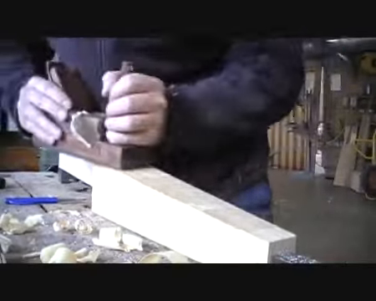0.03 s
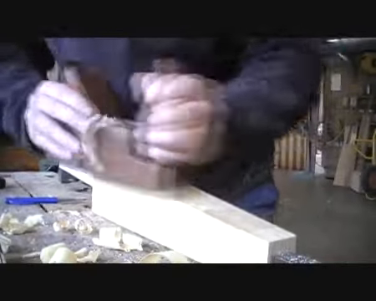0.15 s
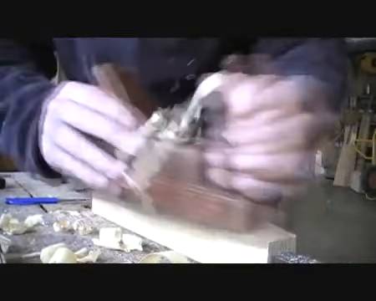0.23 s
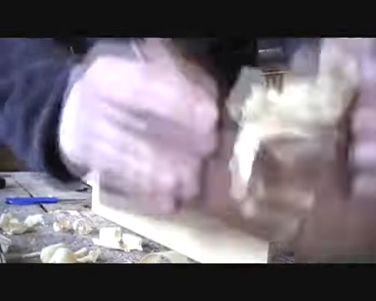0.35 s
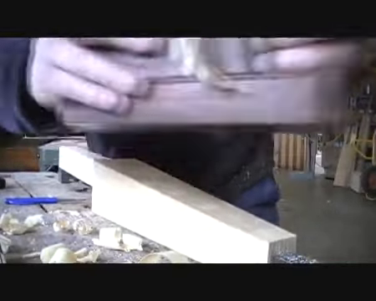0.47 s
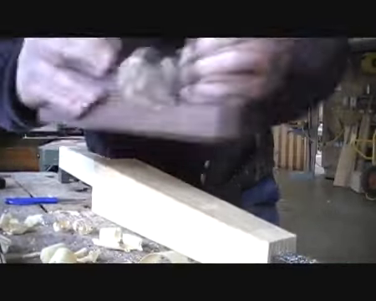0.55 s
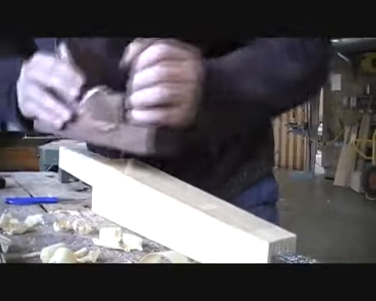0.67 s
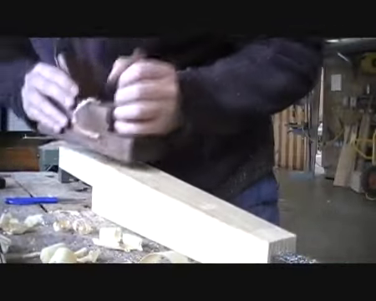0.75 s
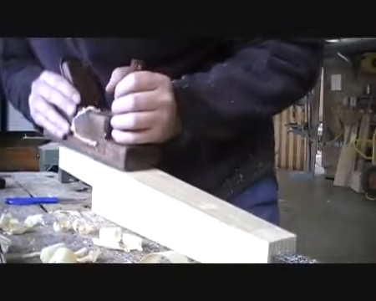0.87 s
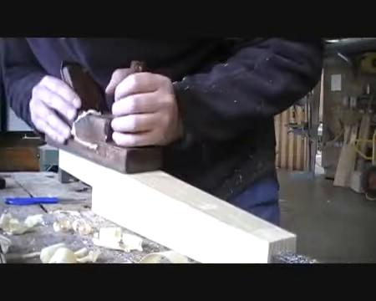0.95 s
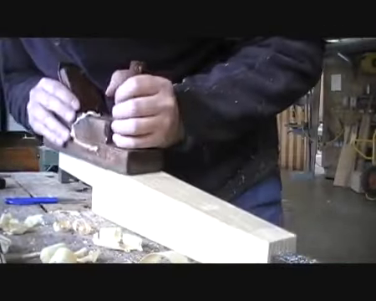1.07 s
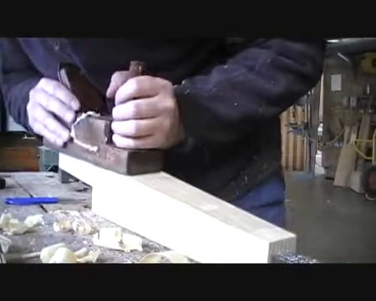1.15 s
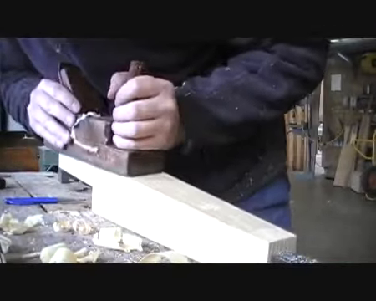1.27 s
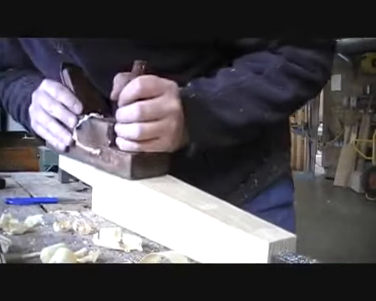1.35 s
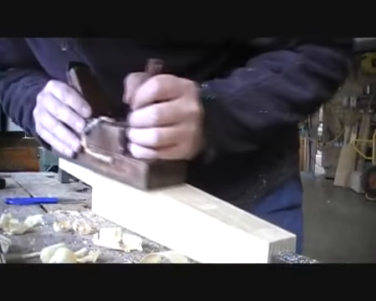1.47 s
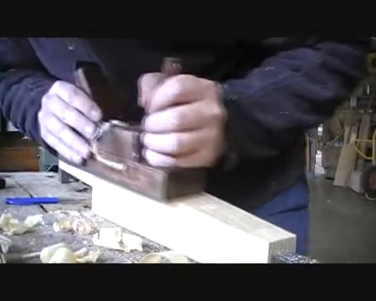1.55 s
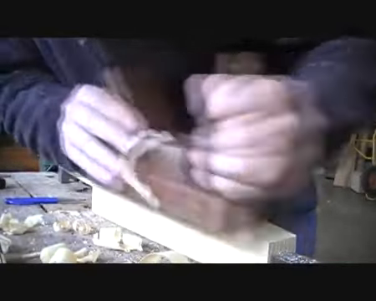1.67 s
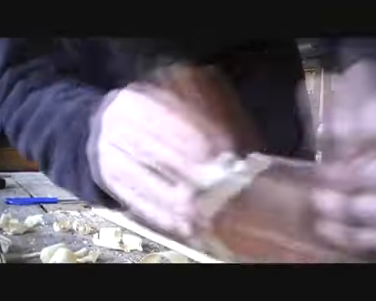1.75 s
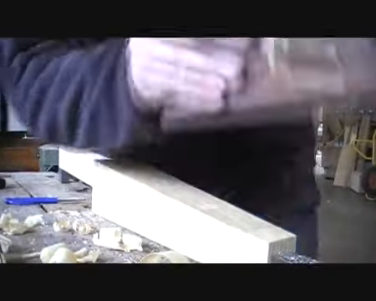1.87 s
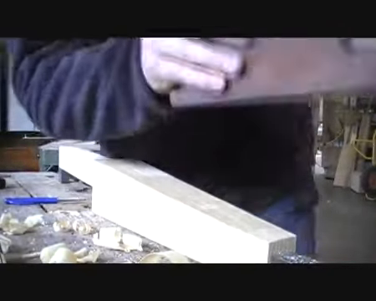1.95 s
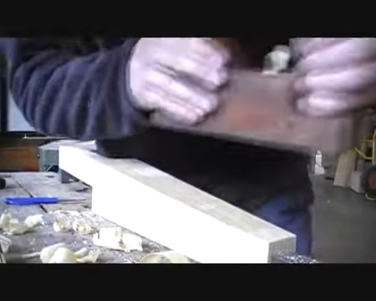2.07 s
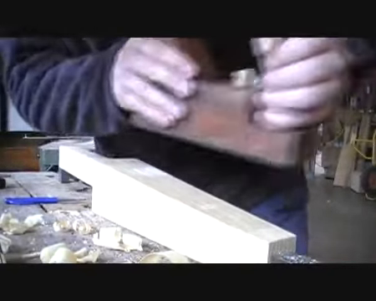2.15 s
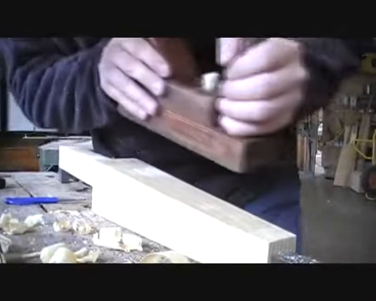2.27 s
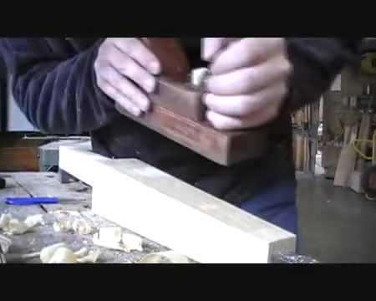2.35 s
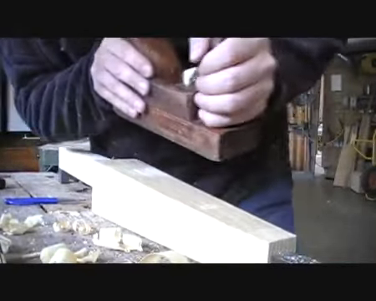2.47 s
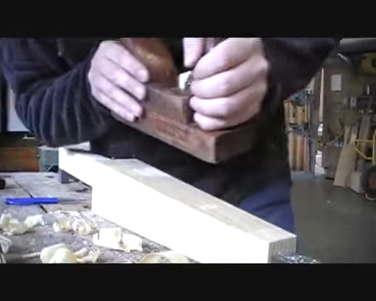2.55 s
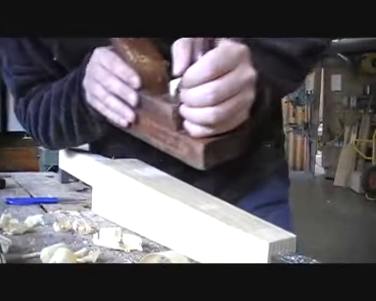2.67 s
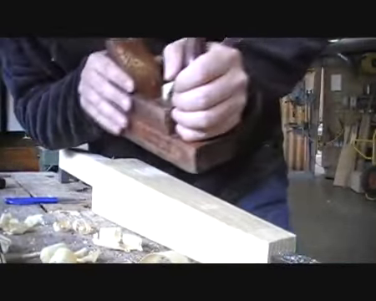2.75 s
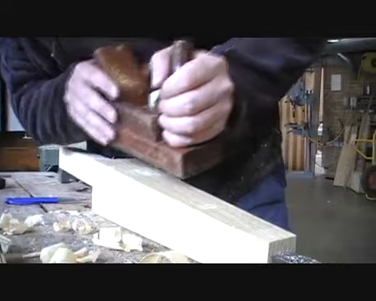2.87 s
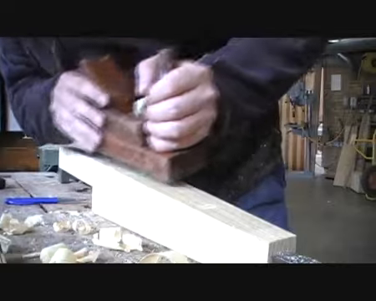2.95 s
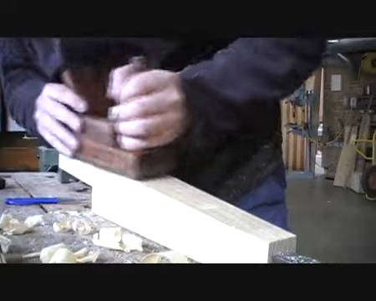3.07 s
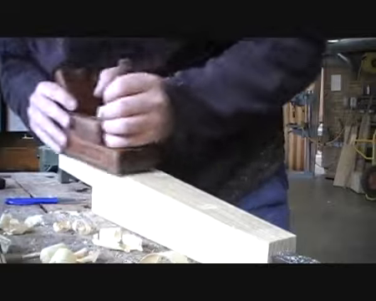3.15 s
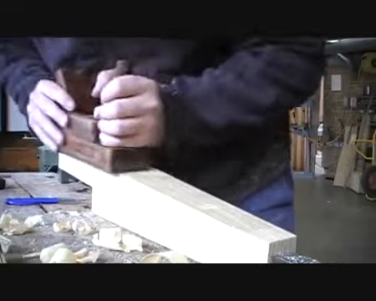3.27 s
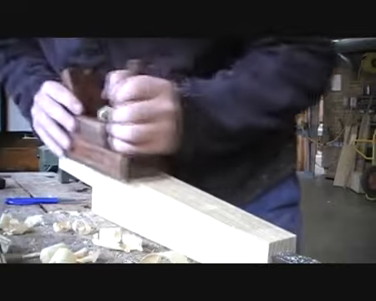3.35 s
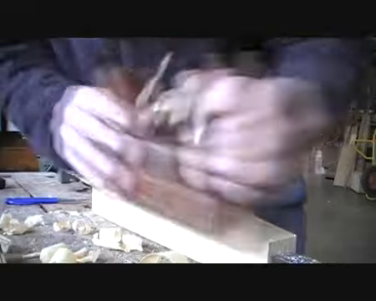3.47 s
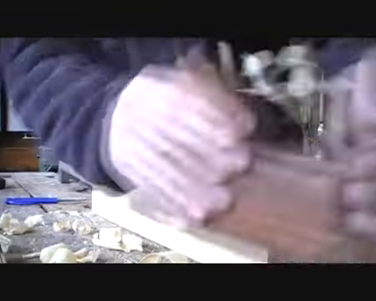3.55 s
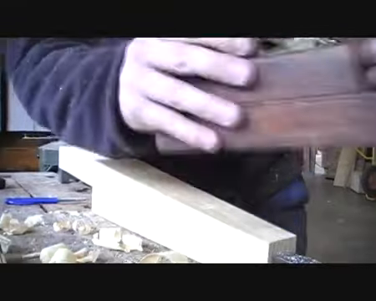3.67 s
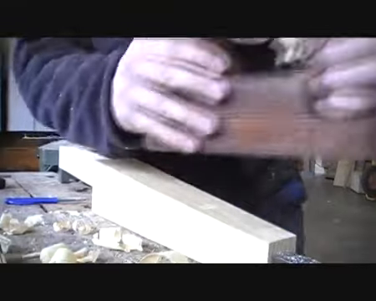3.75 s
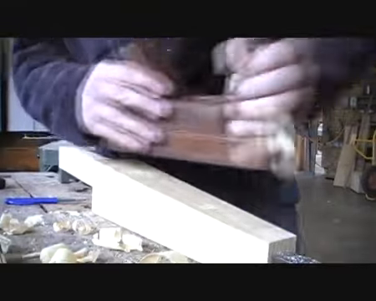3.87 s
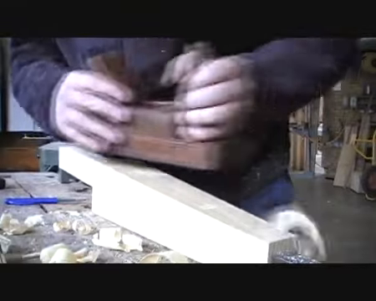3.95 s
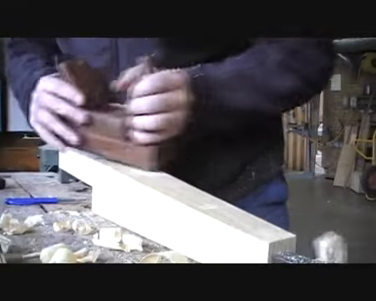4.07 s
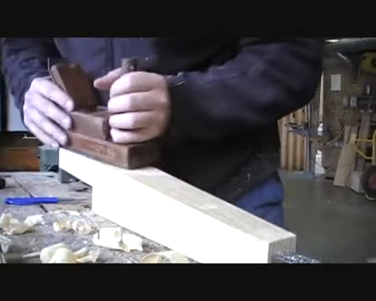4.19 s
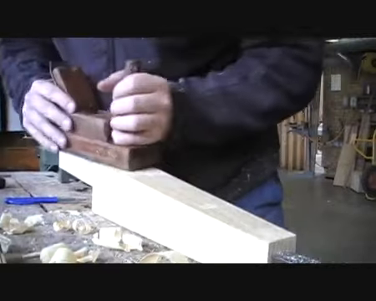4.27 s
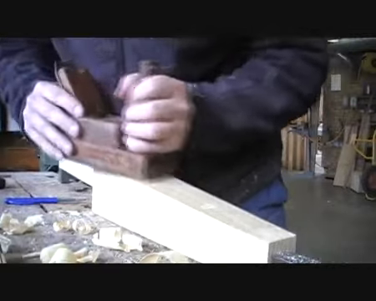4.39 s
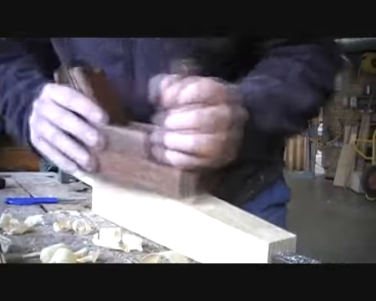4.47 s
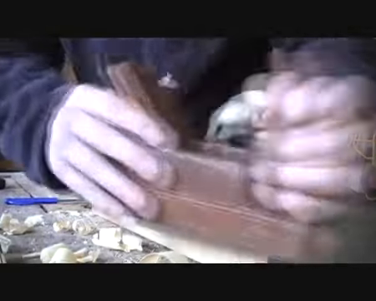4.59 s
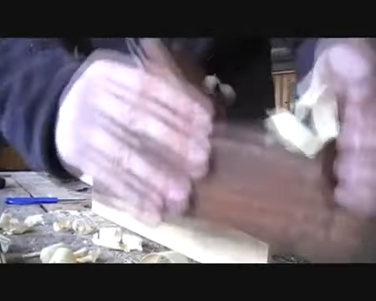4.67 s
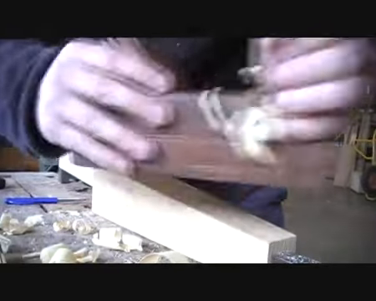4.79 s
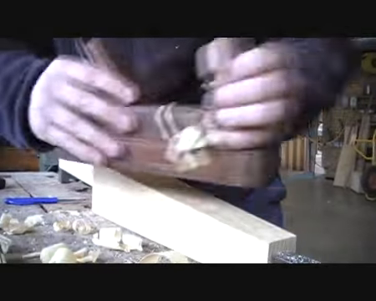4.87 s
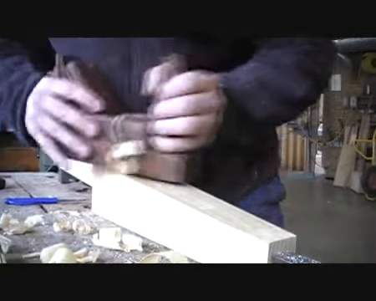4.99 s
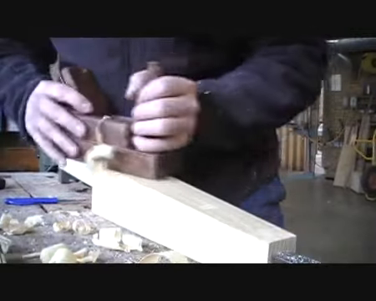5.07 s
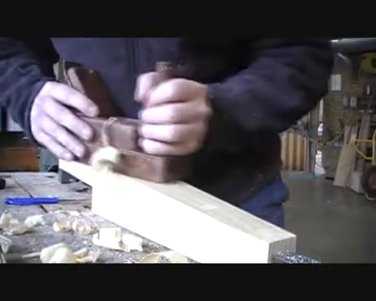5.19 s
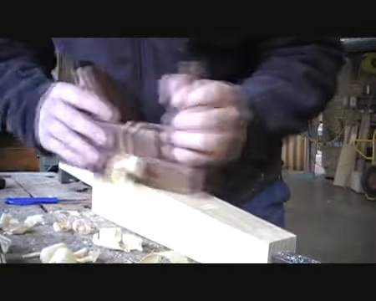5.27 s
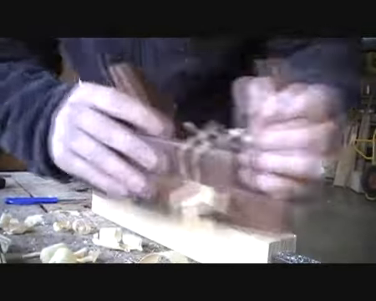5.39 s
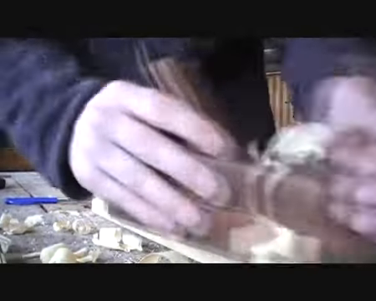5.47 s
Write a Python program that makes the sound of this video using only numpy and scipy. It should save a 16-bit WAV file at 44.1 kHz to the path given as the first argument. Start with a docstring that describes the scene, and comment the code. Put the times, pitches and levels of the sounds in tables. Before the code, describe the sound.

A wooden plane knocks down on clamped timber, then cuts a loud, bright hissing and rasping stroke of about a fifth of a second. Shavings tick and rustle; a lighter stroke ends in a ripping scrape and bump. After a quiet gap, hard knocks precede a third short stroke, then a softer fourth, more knocks and a last brief cut. Close stereo microphone, ringing bare workshop, faint hum.

```python
"""A hand plane knocks down on a bench-clamped timber, then hisses and rasps through a first, loud stroke.
Shavings tick and rustle until a light second stroke ends in a swelling scrape; hard knocks lead into the third.
A softer fourth stroke and more knocks come before the fifth. Knocks ring struck modes of timber and bench;
rubbing, cutting and crackle are random grains through resonances and spectra. A bare workshop rings throughout,
over still air and a faint electrical hum."""
import sys
import numpy as np
from scipy import signal
from scipy.fft import rfft, irfft, next_fast_len
from scipy.io import wavfile
from scipy.ndimage import uniform_filter1d, map_coordinates

SR = 44100
rng = np.random.default_rng(int(sys.argv[2]) if len(sys.argv) > 2 else 0)


def file_out(sig):
    """Save sig as 16-bit WAV at sys.argv[1]."""
    # one column per channel
    cols = np.atleast_2d(sig).T
    # limit, then scale
    lim = np.clip(cols, -1, 1)
    pcm = np.round(lim * 32767).astype(np.int16)
    wavfile.write(sys.argv[1], SR, pcm)


N = 243873
T = np.arange(N) / SR
CREEP_HZ, FAST_HZ = 600, 1650  # grain-passing pitch of a creeping and of a fast plane


def amp(db):
    """Decibels to gain."""
    return 10 ** (np.asarray(db) / 20)


def unit(x):
    """Scales x to an rms of 1."""
    return x / np.sqrt(np.mean(x ** 2) + 1e-20)


def read(points, hz):
    """A spectrum table joined by straight lines on a log-frequency axis."""
    f, value = np.transpose(points)
    return np.interp(np.log(hz + 1), np.log(f), value)


def shape(x, gain):
    """Filters x by a gain that is a function of frequency."""
    size = next_fast_len(x.shape[-1] + 4096)
    spectrum = rfft(x, size) * gain(np.fft.rfftfreq(size, 1 / SR))
    return irfft(spectrum, size)[..., :x.shape[-1]]


def colour(x, points):
    """Gives x the spectrum of a table, at an rms of 1."""
    return unit(shape(x, lambda hz: amp(read(points, hz))))


def add(mix, s, sound):
    """Mixes a sound in at s seconds."""
    part = mix[max(round(s * SR), 0):][:len(sound)]
    part += sound[:len(part)]


def wander(rate_hz):
    """Smooth random movement of unit rms, slower for a lower rate."""
    return unit(shape(rng.standard_normal(N), lambda hz: np.exp(-(hz / rate_hz) ** 2)))


def grains(per_s, spread_db):
    """Tiny fractures at random moments, a few much larger than the rest."""
    size = amp(spread_db * np.minimum(rng.exponential(1, N), 4))
    return unit(size * rng.standard_normal(N) * (rng.random(N) < per_s / SR))


def ring(modes, corner_hz):
    """Decaying modes struck by a blow too soft to reach much above its corner."""
    t = np.arange(SR // 2) / SR
    out = np.zeros(len(t))
    for k, (hz, db, t60) in enumerate(modes):
        softness = np.hypot(1, (hz / corner_hz) ** 2)
        out += (-1) ** k * amp(db - 60 * t / t60) * np.sin(2 * np.pi * hz * t) / softness
    return out


def swells(rows, order=1):
    """Gain over time of sounds that each swell to a peak and die away; a higher order rounds the peak."""
    return sum(amp(db) * np.exp(-np.maximum((s - T) / rise, (T - s) / fall) ** order)
               for s, db, rise, fall in rows)


def curl(x):
    """The growing shaving and the moving plane bring resonances that come and go."""
    patchy_db, patch_hz, patch_s, size, hop = 3.8, 350, .055, 512, 128
    z = signal.stft(x, nperseg=size, noverlap=size - hop)[2]
    patches = uniform_filter1d(rng.standard_normal(z.shape), round(patch_hz * size / SR), axis=0)
    patches = uniform_filter1d(patches, round(patch_s * SR / hop), axis=1)
    patched = z * amp(patchy_db * unit(patches))
    return unit(signal.istft(patched, nperseg=size, noverlap=size - hop)[1][:N])


def drift(x, share, rate_hz):
    """Lets the resonances in x slide up and down together as the plane travels."""
    position = np.arange(N) + np.cumsum(share * wander(rate_hz))
    return unit(map_coordinates(x, [position], order=5, mode="mirror"))


def contact(start, end, run_out_s, touch_s=0.003, run_out_db=-5):
    """Gain that opens as the plane starts to slide and falls ever faster as it runs off the timber."""
    run_out = np.exp(np.minimum((T - end) / run_out_s, 10))
    return np.exp(np.minimum(T - start, 0) / touch_s) * amp(run_out_db * run_out)


def strokes(skim_db=-18.5, rasp_growth=2.9, ease_db=-1.5, ease_s=0.0055):
    """The push builds until the plane takes off and eases at the end; the iron skims, bites and sinks in."""
    # each stroke: (slide starts [s], takes off [s], iron bites [s], time to sink in [s],
    #  iron leaves the wood [s], time to run out [s], sole coasts on for [s],
    #  first push against full push [dB], then levels ahead of each layer's trim: rubbing [dB],
    #  grain scrape [dB], bench rumble [dB], hiss [dB], thick-shaving rasp [dB]; iron singing [0-1])
    passes = [(0.242, 0.264, 0.25, 0.062, 0.45, 0.011, 0.003, 0, -23.5, -25.5, -28, -16.5, -13.5, 0.8),
              (1.386, 1.66, 1.663, 0.1, 1.833, 0.0063, 0.052, -13.5, -31, -38, -39, -24.5, -24.5, 0),
              (3.479, 3.533, 3.49, 0.035, 3.668, 0.002, 0.015, -3, -27.5, -27, -29.5, -23, -36.5, 0.6),
              (4.475, 4.621, 4.622, 0.031, 4.7734, 0.003, 0.0037, -19.5, -25, -30.5, -28.5, -20, -26.5, 0.79),
              (5.309, 5.493, 5.3, 0.046, 5.55, 0.011, 0.011, -9, -20.5, -24.5, -28, -23.5, -33.5, 0.44)]
    rub, scraping, rumble, hiss, rasp, singing = np.zeros((6, N))
    for (start, takeoff, bite, sink_s, end, run_out_s, coast_s, light_db,
         rub_db, scrape_db, rumble_db, hiss_db, rasp_db, sing) in passes:
        build_db = light_db * (1 - np.interp(T, [start, takeoff], [0, 1]) ** 2)
        push = amp(build_db + ease_db * np.exp(np.minimum(T - end, 0) / ease_s))
        depth = amp(skim_db * np.exp(-np.maximum(T - bite, 0) / sink_s))
        sliding = contact(start, end + coast_s, run_out_s)
        cutting = contact(start, end, run_out_s)
        rub += amp(rub_db) * sliding * push
        scraping += amp(scrape_db) * sliding * push
        rumble += amp(rumble_db) * sliding * np.sqrt(push)
        hiss += amp(hiss_db) * cutting * push * depth
        rasp += amp(rasp_db) * cutting * push * depth ** rasp_growth  # grows faster with depth than hiss
        # the iron sings most towards the end of the cut
        singing = np.where(T > start - .05, sing * np.interp(T, [bite, end], [0, 1]) ** 2, singing)
    return rub, scraping, rumble, hiss, rasp, singing


def iron(hissing, rasping, singing, rasp_trim_db=-3):
    """Fibres part by the thousand in uneven tears, and the iron's modes sing at a pitch that wavers."""
    # hiss and rasp spectra: (frequency [Hz], relative level [dB])
    hiss_spectrum = [(1500, -16), (3200, -11), (4700, -12.5), (5400, -3.5), (5900, -8.5), (6400, -8.5),
                     (7200, -10), (8500, -8.5), (9700, -16), (11000, -19), (13500, -31), (16000, -61)]
    rasp_spectrum = [(500, -37.5), (1300, -10), (1900, -4.5), (2250, -7), (2700, 3.5), (3150, -9.5),
                     (3900, -8), (4800, 2), (8000, -63)]
    # modes of the iron and its wedge: (frequency [Hz], relative level [dB], t60 [s])
    iron_modes = [(1710, -18, 0.09), (4950, 6, 0.0078), (5340, 19.5, 0.038), (5970, 16.5, 0.018),
                  (6600, 6, 0.016), (8400, -6.5, 0.0068)]
    uneven_db, tear_db, slide, slide_hz = 1.8, 1.5, .016, 16
    grain = amp(uneven_db * wander(390))
    hiss = curl(colour(grains(22000, 0.35) * grain, hiss_spectrum))
    coarse = grains(6000, 0.87) * grain * amp(tear_db * wander(60))
    rasp = drift(curl(colour(coarse, rasp_spectrum)), slide, slide_hz)
    struck = signal.fftconvolve(grains(22000, 0.93) * grain, ring(iron_modes, 18300))[:N]
    sing = drift(struck, slide, slide_hz)
    share = np.clip(singing, 0, 1)
    edge = np.sqrt(1 - share) * hiss + np.sqrt(share) * sing
    return edge * hissing + amp(rasp_trim_db) * rasp * rasping


def sole(rubbing, rumbling, speed_hz, rub_trim_db=1.0, rumble_trim_db=-2, uneven_db=2.0,
         ring_share=0.49, dull_hz=1150, glide_db=-5):
    """Small slips of wood on wood ring the plane and shake the bench; speed brightens the rub, eases the rumble."""
    # spectra of the rub and of the bench rumble: (frequency [Hz], relative level [dB])
    rub_spectrum = [(150, -37), (350, 2.5), (620, 8), (760, 1), (920, 1.5), (1170, 1.5), (1450, -5.5),
                    (1750, 3), (2150, -2.5), (3500, -13.5), (8000, -62.5)]
    rumble_spectrum = [(20, -36), (60, -15), (100, -6), (135, 5), (175, 4.5), (260, 0.5), (360, -11.5),
                       (520, -12), (1000, -38.5)]
    # modes of the plane body, damped by the hands: (frequency [Hz], relative level [dB], t60 [s])
    plane_modes = [(365, 3.5, 0.064), (554, -1, 0.086), (778, -1.5, 0.32), (1010, 9, 0.017),
                   (1340, 7, 0.073), (1490, -11, 0.024)]
    slips = grains(9000, 0.34) * amp(uneven_db * wander(51))
    body = unit(signal.fftconvolve(slips, ring(plane_modes, 5000))[:N])
    bright = drift(colour(slips, rub_spectrum) + ring_share * body, .06, 12)
    dull = unit(shape(bright, lambda hz: 1 / np.hypot(1, (hz / dull_hz) ** 3)))
    fast = np.interp(speed_hz, [CREEP_HZ, FAST_HZ], [0, 1])
    rub = fast * bright + (1 - fast) * dull
    rumble = colour(grains(3000, 2.3), rumble_spectrum)
    return amp(rub_trim_db) * rub * rubbing + amp(rumble_trim_db + glide_db * fast) * rumble * rumbling


def scrape(scraping, speed_hz, width_hz=270):
    """The sole passes over the grain: a rough band that rises and falls with the speed of the plane."""
    angle = 2 * np.pi * np.cumsum(speed_hz) / SR
    note = unit(wander(width_hz) * np.cos(angle) + wander(width_hz) * np.sin(angle))
    return np.sqrt(speed_hz / FAST_HZ) * note * scraping


def end_scrapes():
    """At the end of a stroke: dense fractures in a quick swelling scrape."""
    # (time of the peak [s], level [dB], rise [s], fall [s])
    scrape_swells = [(1.908, -12.5, 0.0088, 0.0055), (3.69, -13.5, 0.0075, 0.009)]
    spectrum = [(150, -6.0), (650, 6.5), (1200, -3.5), (1900, 1.0), (3000, -6.5), (4700, -3.5), (5400, 6.5),
                (6200, -3.5), (7400, -10.5), (8400, 1.0), (9600, -13.0), (14000, -24.5), (16000, -41)]
    return swells(scrape_swells, order=1.3) * colour(grains(15000, 0.63), spectrum)


def tears(cycles=3.2):
    """The iron catches in the grain: coarse fractures each ring the stiff shaving for a few cycles."""
    # (time [s], level [dB], length [s], ringing frequency [Hz])
    catches = [(1.797, -34, 0.042, 950), (3.54, -19.5, 0.034, 1419), (4.618, -26, 0.04, 1620),
               (5.338, -30.5, 0.1, 1820), (5.481, -21.5, 0.05, 1608)]
    out, t, snaps = np.zeros(N), np.arange(SR // 100) / SR, grains(1500, 1)
    for s, db, length, centre_hz in catches:
        size = int(length * SR)
        snap = np.sin(2 * np.pi * centre_hz * t) * np.exp(-centre_hz * t / cycles)
        run = unit(signal.fftconvolve(np.roll(snaps, -round(s * SR))[:size], snap)[:size])
        add(out, s, amp(db) * run * np.sin(np.linspace(0, np.pi, size)))
    return out


def judders(jitter=0.045, octaves=0.78):
    """Nearly regular bounces as the iron bites or breaks free, quick to build and slower to die."""
    # (time [s], level [dB], length [s], bounce rate [Hz], strongest frequency [Hz])
    bounces = [(0.255, -23, 0.036, 327, 386), (0.294, -21.5, 0.042, 390, 1130),
               (0.415, -20.5, 0.022, 325, 670), (1.601, -22, 0.056, 346, 403), (1.91, -26, 0.056, 250, 249),
               (3.539, -18.5, 0.037, 368, 570), (4.577, -33, 0.065, 300, 558), (5.41, -25, 0.079, 358, 677)]
    out = np.zeros(N)
    for s, db, length, rate_hz, centre_hz in bounces:
        size = int(length * SR)
        turns = np.cumsum(rate_hz * (1 + jitter * wander(120)[:size])) / SR
        buzz = np.zeros(size)
        for k in range(1, 6):
            distance = np.log2(k * rate_hz / centre_hz) / octaves
            # bending waves in the timber smear each bounce, so the overtones fall out of step
            buzz += np.sin(2 * np.pi * (k * turns + rng.random())) / (1 + distance ** 2) ** 1.44
        envelope = np.sin(np.pi * np.sqrt(np.linspace(0, 1, size))) ** 2
        add(out, s, amp(db) * unit(buzz * envelope))
    return out


def knocks(clatter_db=-7, clatter_s=0.017, node_share=0.68, thud_rise_s=0.0061):
    """The plane lands or bumps: timber and bench modes ring, and the sole clatters briefly as it seats."""
    # (time [s], level [dB], hardness as a corner [Hz], bench thud relative to the knock [dB],
    #  place along the timber [0-1])
    landings = [(0.0572, -21, 1000, 8, .2), (0.079, -23.5, 1820, -8.5, 0.39),
                (0.247, -22.5, 2800, -3.5, 0.02), (0.7948, -35.5, 1890, -21.5, 0.03),
                (1.0566, -23, 830, 1, 0.05), (1.912, -18.5, 423, 0, 0.44), (3.205, -13.5, 1020, -3.5, .25),
                (3.221, -15, 600, -7.5, 0.2), (4.269, -27, 222, 4, 0.4), (4.316, -33.5, 200, 3, 0.3),
                (4.513, -34, 520, 6.5, .4), (5.198, -15.5, 707, 5.5, 0.2), (5.216, -18, 1273, -28.5, 0.06),
                (5.234, -22.5, 1540, -9.5, .22), (5.311, -16.5, 796, -5, 0.6)]
    # modes of timber and bench: (nominal frequency [Hz], relative level [dB], t60 [s])
    timber_modes = [(293, -5.5, 0.1), (359, 2, 0.064), (440, -6, 0.21), (575, 3, 0.15), (690, 8.5, 0.064),
                    (759, -4.5, 0.1), (950, 3, 0.055), (1000, -6.5, 0.069), (1290, -3, 0.03),
                    (1680, -0.5, 0.027), (1830, 3, 0.038)]
    bench_modes = [(76, -2.5, 0.037), (136.3, -8.5, 0.27), (166, -1, 0.27), (187.5, -8, 0.17),
                   (241.7, -2, 0.15), (262, -1, 0.067), (393.5, -8.5, 0.23)]
    out, t = np.zeros(N), np.arange(SR // 2) / SR
    for s, db, corner_hz, thud_db, place in landings:
        # the weight of the plane detunes each mode a little
        grip = 1 + .02 * rng.standard_normal(len(timber_modes))
        modes = []
        for k, (hz, gain_db, t60) in enumerate(timber_modes):
            # a mode rings less when the blow lands near one of its nodes
            reach = node_share + abs(np.sin((k + 1) * np.pi * place))
            modes.append((hz * grip[k], gain_db + 20 * np.log10(reach), t60))
        clatter = unit(shape(rng.standard_normal(len(t)),
                             lambda hz: hz / (hz + 120) / np.hypot(1, (hz / corner_hz) ** 3.14)))
        wood = 0.66 * ring(modes, corner_hz) + amp(clatter_db) * clatter * np.exp(-t / clatter_s)
        thud = amp(thud_db) * ring(bench_modes, corner_hz) * (1 - np.exp(-t / thud_rise_s))
        add(out, s, amp(db) * (wood + thud))
    # wood radiates little deep bass or treble
    return signal.sosfilt(signal.butter(2, [70, 3200], "band", fs=SR, output="sos"), out)


def scuffs():
    """Sparse, coarse slips of the sole as it seats on the timber, each a small woody tap."""
    # (time of the peak [s], level [dB], rise [s], fall [s])
    seatings = [(0.105, -36.5, 0.0092, 0.13), (3.325, -33.5, 0.05, 0.075), (5.225, -24, 0.008, 0.013)]
    spectrum = [(200, -9.5), (330, -1), (680, 3.5), (1050, -8), (1500, -26), (4000, -47)]
    return swells(seatings) * colour(grains(1100, 0.89), spectrum)


def ticks(rise_s=0.00012, decay_s=0.0019, width=1.7, narrow_hz=12000, after_db=-20, after_s=0.0032,
          snap=0.49, shiver=0.37):
    """Sharp contacts and snapping shavings: a snap with a short noisy shiver, narrower in band when higher."""
    # (time [s], level ahead of the snap and shiver shares [dB], centre frequency [Hz])
    snaps = [(0.0572, -5.5, 9200), (0.2466, -14, 4350), (0.261, -20, 5500), (0.5162, -11, 4630),
             (0.634, -15, 5250), (0.64, -15, 5740), (0.646, -22, 6620), (0.7453, -31, 10500),
             (0.7955, -12, 2070), (0.883, -28.5, 6100), (1.0584, -21.5, 1500), (1.3868, -53.5, 1040),
             (2.9374, -32, 2080), (2.95, -38, 6400), (3.082, -43.5, 2350), (3.208, -18.5, 2780),
             (3.482, -26.5, 1680), (3.7655, -17.5, 2400), (4.115, -36, 6000), (4.2676, -22.5, 2597),
             (5.1972, -12.5, 5140), (5.2327, -17, 7100)]
    out, t = np.zeros(N), np.arange(-SR // 200, SR // 20) / SR
    age = np.maximum(t, 0)
    decay = np.exp(-age / decay_s) + amp(after_db) * np.exp(-age / after_s)
    envelope = np.exp(np.minimum(t, 0) / rise_s) * decay
    for s, db, centre_hz in snaps:
        def band(hz):
            distance = np.log((hz + 1) / centre_hz) * (1 + centre_hz / narrow_hz) / width
            treble_loss = np.hypot(1, (hz / min(11500, 4.6 * centre_hz)) ** 4)
            return 1 / (1 + distance ** 2) ** 2 / treble_loss
        click, noise = shape(np.array([t == 0, rng.standard_normal(len(t))]), band)
        add(out, s + t[0], amp(db) * (snap * click / click.max() + shiver * unit(noise) * envelope))
    return out


def shavings(rustle_trim_db=-2, whisper_trim_db=-2, clump_db=1.5):
    """Dry curls crackle faintly in clumps; the sole whispers thinly as it is drawn into place."""
    # both tables: (time of the peak [s], level ahead of the trim [dB], rise [s], fall [s])
    rustles = [(0.16, -51, 0.48, 0.19), (0.51, -40.5, 0.044, 0.13), (0.86, -45, 0.21, 0.05),
               (1.85, -33.5, 0.02, 0.015), (1.98, -43.5, 0.43, 0.27), (3.32, -55.5, 0.1, 0.143),
               (4.1, -46, 0.48, 0.2), (4.85, -47, 0.24, 0.12), (5.17, -48, 0.28, 0.222)]
    whispers = [(4.275, -34.5, 0.0017, 0.016), (4.323, -38.5, 0.0091, 0.013), (4.435, -43.5, 0.035, 0.022),
                (4.56, -41.5, 0.024, 0.032)]
    crackle = colour(grains(5000, 2.2) * amp(clump_db * wander(68)),
                     [(500, 9), (1500, 8), (3500, 3), (6000, -4.0), (10000, -7.5), (13000, -16.0), (16000, -40)])
    whisper = colour(grains(12000, 1.73),
                     [(3000, -4.5), (6500, 3.5), (7600, 12), (8400, 18.0), (9500, 6), (14000, -6)])
    rustling = amp(rustle_trim_db) * crackle * swells(rustles)
    return rustling + amp(whisper_trim_db) * whisper * swells(whispers)


def diffuse(tail):
    """Evens out a room tail so that no single note booms, and fades its end."""
    narrow, wide = 12, 120  # smoothing widths in spectrum bins
    z = rfft(tail)
    power = abs(z) ** 2
    even = np.sqrt(abs(uniform_filter1d(power, wide)) / (abs(uniform_filter1d(power, narrow)) + 1e-20))
    return irfft(z * even, tail.shape[-1]) * np.clip(np.linspace(3, -1, tail.shape[-1]), 0, 1)


def workshop(x, side_db=-5, near_db=-14, near_s=0.0089):
    """Near reflections off bench and body, then a long tail that dies band by band."""
    # decay time: (frequency [Hz], t60 [s])
    room_t60 = [(100, 0.67), (250, 0.83), (700, 0.93), (2000, 0.66), (5000, 0.41), (9000, 0.32),
                (15000, .35)]
    # level of the tail: (frequency [Hz], level [dB])
    room_send = [(25, -22), (70, -9), (160, -5), (400, -6.5), (700, -8), (2000, -12), (4300, -12.5),
                 (5400, -23), (7000, -12.5), (12000, -19)]
    # side level of the near reflections: (frequency [Hz], level [dB])
    spread = [(100, -16.5), (350, -5.5), (700, -5.5), (2000, -15.5), (4000, -15.5), (5600, -26),
              (8000, -9.5), (13000, -7)]
    t = np.arange(int(1.5 * SR)) / SR
    hz, age, z = signal.stft(rng.standard_normal((2, len(t))), SR, nperseg=512)
    t60 = read(room_t60, hz)[:, None]
    even_energy = np.sqrt(2 * np.log(1000) / t60 / SR)  # a longer decay starts lower
    z = z * amp(read(room_send, hz)[:, None] - 60 * age / t60) * even_energy
    tail = diffuse(signal.istft(z, SR, nperseg=512)[1][:, :len(t)]) * (1 - np.exp(-t / 0.0012))
    near = rng.standard_normal((2, len(t)))
    for _ in range(8):  # the reflections scatter in time but favour no pitch
        phase = np.angle(rfft(near * np.exp(-t / near_s)))
        near = irfft(np.exp(1j * phase), len(t)) * (t > .001) * (t < 6 * near_s)
    near /= np.linalg.norm(near, axis=1, keepdims=True)
    near_side = shape(near[1], lambda hz: amp(read(spread, hz)))
    mid = signal.fftconvolve(x, tail[0] + amp(near_db) * near[0])[:N]
    side = signal.fftconvolve(x, amp(side_db) * tail[1] + near_side)[:N]
    return np.array([mid + side, mid - side])


def background(air_db=-54.5):
    """Still workshop air as coloured noise, and a faint electrical hum of slowly wavering sines."""
    # spectrum of the air: (frequency [Hz], relative level [dB])
    air_spectrum = [(25, -73), (96, -1.5), (148, -1), (199, 6.5), (340, 0.5), (400, 2), (872, -2),
                    (1950, -12.5), (2240, -12), (2420, -18.5), (8360, -18), (15500, -29.5)]
    # tones of the hum: (frequency [Hz], rms level [dB])
    hum_tones = [(100, -67), (199.2, -63.5), (398.4, -64), (2191, -67)]
    air = colour(rng.standard_normal((2, N)), air_spectrum)
    hum = sum(amp(db) * np.sqrt(2) * np.sin(2 * np.pi * hz * T + 0.74 * wander(8.3)) for hz, db in hum_tones)
    return amp(air_db) * unit(air + 0.018 * air[::-1]) + hum


def scene(edge_send_db=0.5):
    """All the sounds of the work ring in the workshop, over its still air."""
    # speed of the plane as the pitch at which its sole passes over the grain: (time [s], pitch [Hz])
    speed = [(0.25, 600), (0.275, 691), (0.31, 1200), (0.37, 1620), (0.46, 1942), (1.39, 950), (1.59, 677),
             (1.68, 1151), (1.77, 1498), (1.83, 1099), (1.88, 516.4), (3.48, 724.4), (3.54, 950),
             (3.6, 1340), (3.66, 947), (4.51, 740.4), (4.6, 720), (4.645, 1447), (4.77, 1763), (5.32, 600),
             (5.42, 718), (5.485, 1448), (5.53, 1690)]
    rubbing, scraping, rumbling, hissing, rasping, singing = strokes()
    speed_hz = np.interp(T, *np.transpose(speed))
    edge = iron(hissing, rasping, singing) + tears() + end_scrapes()
    wood = sole(rubbing, rumbling, speed_hz) + scrape(scraping, speed_hz)
    wood = wood + judders() + knocks() + scuffs() + ticks() + shavings()
    return wood + edge + workshop(wood + amp(edge_send_db) * edge) + background()


def record(dry):
    """Two microphone ports hear the bass mostly on the right; high peaks are rounded, then the band limited."""
    # balance: (frequency [Hz], left minus right [dB])
    balance = [(40, -8), (160, -5), (320, -10), (700, -6.5), (1400, -2), (2800, -2.5), (5500, 0),
               (9000, -1.8)]
    # phase lead: (frequency [Hz], left ahead of right [rad])
    lead = [(100, -0.61), (350, 0.42), (700, 0.32), (1600, 0.74), (4000, 0.28), (12000, 0.086)]

    def ports(hz):
        pair = amp(np.outer([.5, -.5], read(balance, hz)))
        return pair / pair.mean(0) * np.exp(1j * np.outer([.5, -.5], read(lead, hz)))
    heard = shape(dry, ports)
    rounded = heard / (1 + (heard / .92) ** 8) ** (1 / 8)
    band_limit = signal.firwin(255, 15200, window=("kaiser", 9), fs=SR)  # low-pass, cutoff in Hz
    return signal.oaconvolve(rounded, band_limit[None], "same")


dry = scene()
out = record(dry)
file_out(out)
```